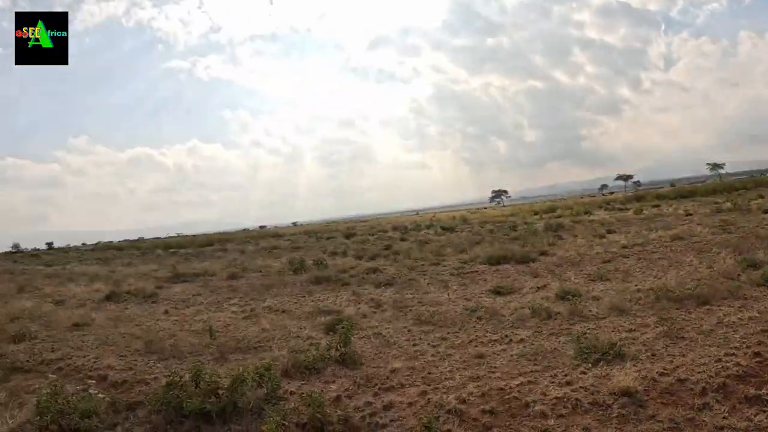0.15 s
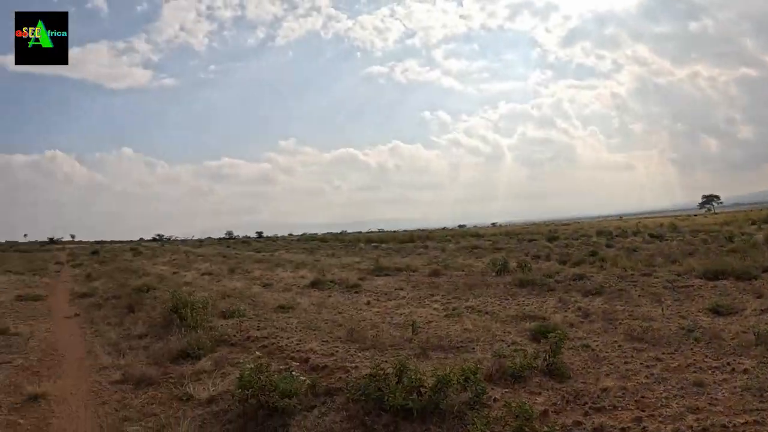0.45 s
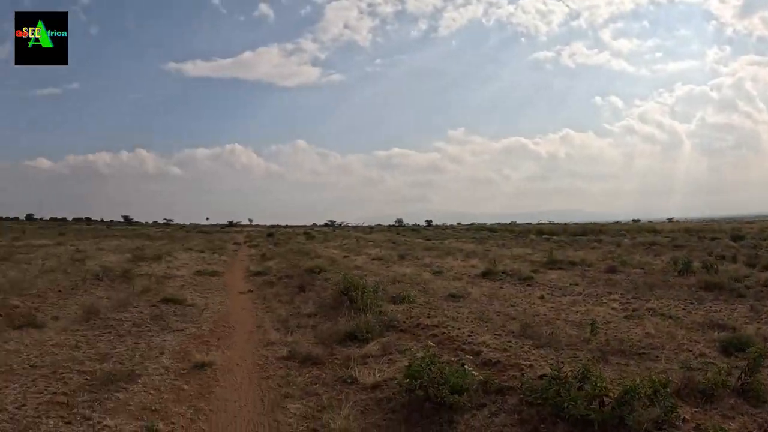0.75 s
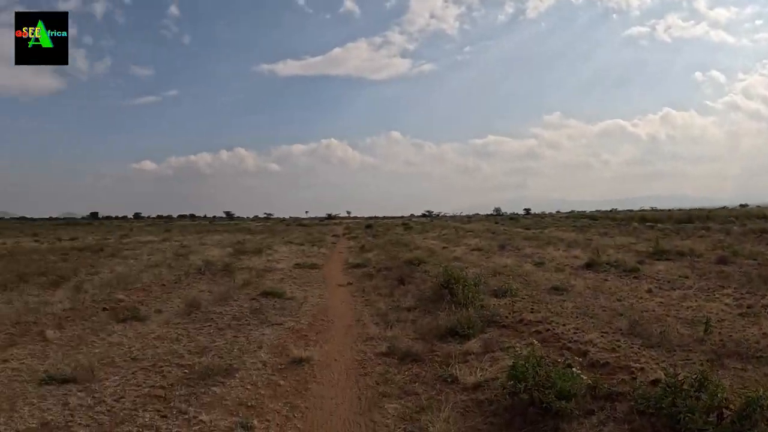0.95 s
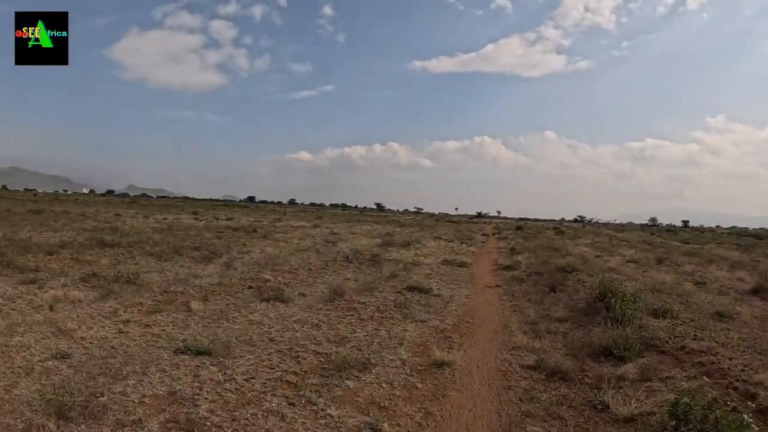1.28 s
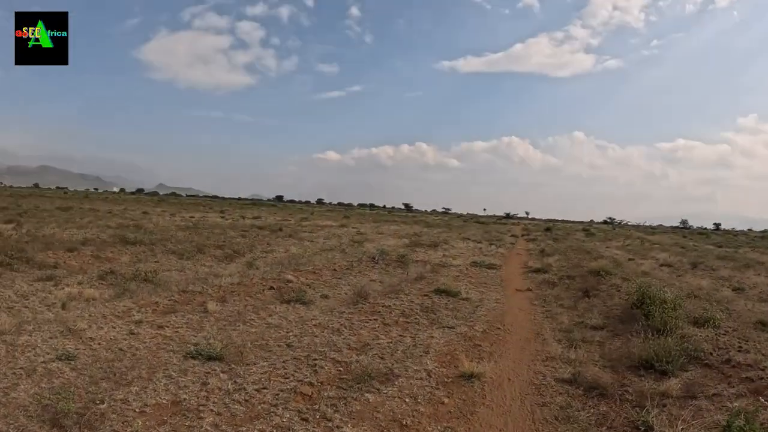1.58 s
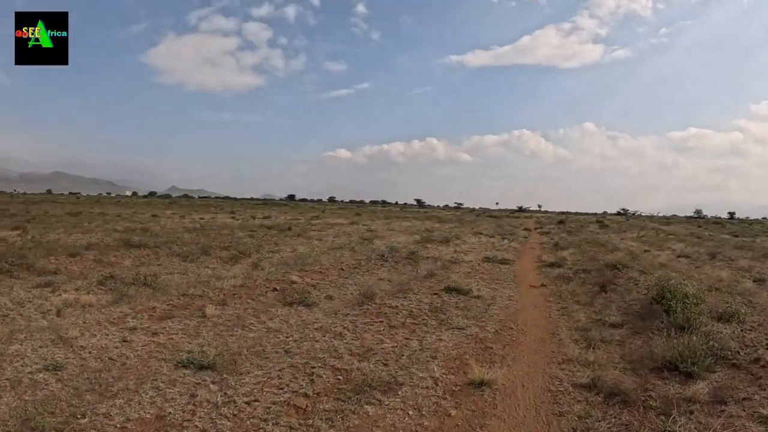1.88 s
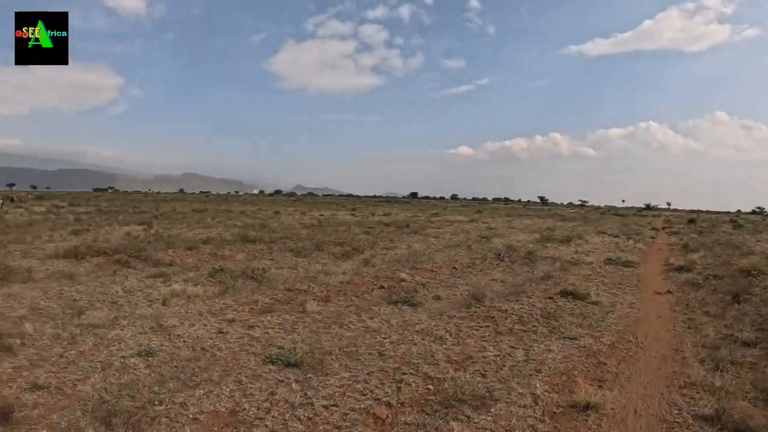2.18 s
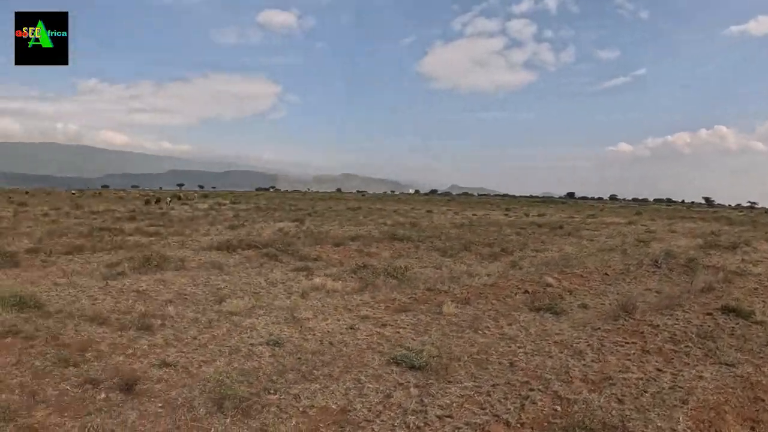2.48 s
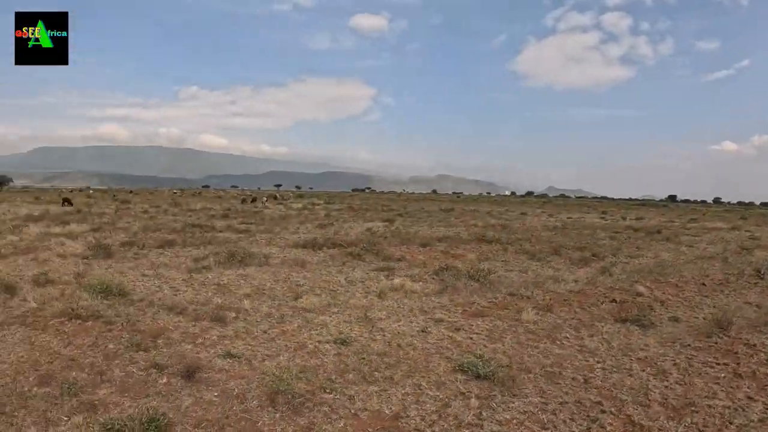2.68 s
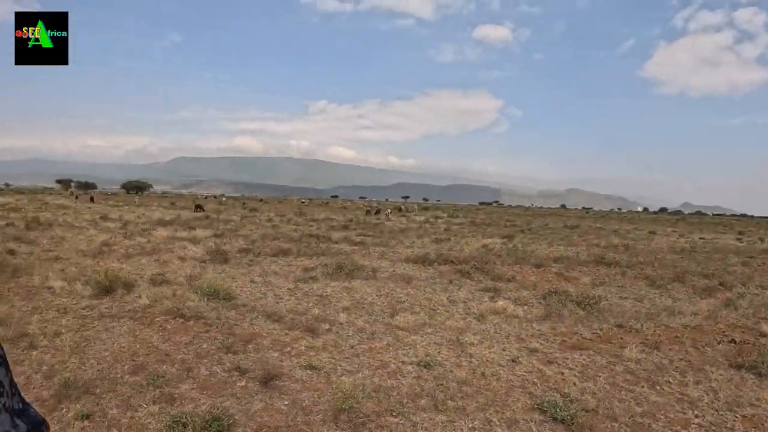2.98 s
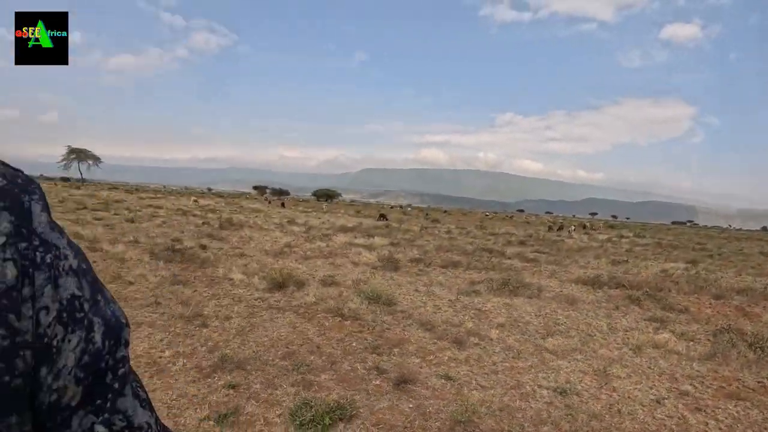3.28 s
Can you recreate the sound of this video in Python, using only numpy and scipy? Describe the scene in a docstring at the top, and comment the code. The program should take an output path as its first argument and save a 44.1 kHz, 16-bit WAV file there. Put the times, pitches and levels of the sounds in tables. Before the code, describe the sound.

Wind rumbles and thumps on a handheld microphone over open dry grassland, with faint rustles and ticks; after two seconds a distant sheep bleats quaveringly and a second joins, lower and level, under hard gusts.

```python
"""Wind rumbles on the microphone and dry grass rustles, with small ticks close by and faint swishes:
all are shaped noise. Two sheep then bleat some way off on open grassland, one quavering, the other
joining with a level, buzzing call: vocal-fold pulses and puffs of noise filtered by a throat.
Gusts, swells of low noise, buffet the microphone hard during the bleats, with sudden pops."""
import sys
import numpy as np
from scipy import signal
from scipy.fft import rfft, irfft
from scipy.io import wavfile

SR = 44100
rng = np.random.default_rng(int(sys.argv[2]) if len(sys.argv) > 2 else 0)


def transcribe(u):
    """Save the signal u as a 16-bit wav file named by the first command-line argument.

    u: samples, shape (n,) or (channels, n), limited to [-1, 1]; the rate is SR.
    q: integer samples, one column per channel.
    """
    v = np.clip(np.atleast_2d(u).T, -1, 1)
    q = np.round(v * 32767).astype(np.int16)
    wavfile.write(sys.argv[1], SR, q)


N = 152145
T = np.arange(N) / SR  # time [s]

# Throbs of the quavering bleat:
# (time [s], level [dB], top pitch [Hz], roughness [0-1], mouth opening [0-1])
QUAVER_THROBS = [(2.128, -63, 222.3, .55, 0.98), (2.205, -58.5, 263.4, 0.55, .8),
                 (2.285, -58, 280, 0.56, 0.55), (2.338, -56, 270.5, 0.2, 0.66),
                 (2.408, -52.5, 272.8, 0.12, 0.32), (2.478, -56, 276, 0, 0), (2.552, -55.5, 278.6, 0, 0.05),
                 (2.626, -56.5, 285.2, 0.1, 0.06), (2.705, -61, 280.8, 0.15, 0),
                 (2.779, -51.5, 274.4, 0.2, 0.4), (2.843, -50.5, 239, 0.3, 0.64),
                 (2.916, -51.5, 248.2, .2, 0.8), (2.998, -53, 223.4, 0.3, 0.6),
                 (3.073, -48.5, 277.1, 0.2, 0.2), (3.152, -53, 242, 0.3, 0.06)]
# Throat response of the quavering sheep:
# (frequency [Hz], gain with mouth half shut [dB], gain with mouth wide open [dB])
QUAVER_THROAT_RESPONSE = [(250, -7, -10.5), (550, 0.5, -10), (834, -8, 0.5), (1180, -32.5, -6),
                          (1600, -39.5, -30.5), (1930, -17.5, -23.5), (2330, 0, 0.5), (2546, -6.5, -16.5),
                          (2890, -6, -15), (3346, 4.5, 4), (3380, -1, -9.5), (3680, -1, 5.5),
                          (4070, -21.5, -10), (5540, -22, -19.5), (6500, -32, -16), (8100, -48, -34),
                          (10140, -56.5, -51.5)]
# Mean pitch of the level bleat: (time [s], pitch [Hz])
LEVEL_PITCH = [(2.64, 168), (2.72, 175), (2.8, 177.5), (2.9, 178.3), (3.0, 179), (3.1, 180.5),
               (3.16, 179.5), (3.21, 174.8), (3.25, 177), (3.295, 174), (3.335, 167.5), (3.42, 152)]
# Vocal effort of the level bleat: (time [s], level [dB], roughness [0-1])
LEVEL_EFFORT = [(2.62, -98.5, 0.2), (2.67, -59.5, 0.48), (2.77, -64, .2), (2.85, -55.5, 0.4),
                (2.95, -57.5, 0.3), (3.08, -60, 0), (3.19, -57.5, 0.04), (3.28, -56.5, 0.04),
                (3.33, -58.5, .02), (3.36, -65, 0.3), (3.44, -90, .4)]
# Throat response of the level sheep: (frequency [Hz], gain [dB])
LEVEL_THROAT_RESPONSE = [(180, -4.5), (500, -17), (720, 3.5), (920, -21), (1200, -18), (1440, -1),
                         (1720, -14), (1950, -6), (2200, 7), (2360, 0.5), (2520, 3.5), (2850, -10),
                         (3300, -5), (4150, -3), (4700, -25), (5700, -13), (6600, -31), (7500, -21.5),
                         (9000, -33.5), (11000, -55.5)]
# Gusts on the microphone, before roughening:
# (time [s], half length [s], level [dB], upper corner [Hz])
GUST_EDDIES = [(-0.01, 0.027, -35.5, 168), (0.153, 0.093, -43, 264), (0.49, 0.31, -51, 199),
               (0.636, 0.062, -35, 118), (0.901, 0.04, -30.5, 141), (1.046, 0.032, -34.5, 165),
               (1.232, 0.03, -34, 150), (1.405, 0.036, -40, 315), (1.546, 0.034, -32.5, 217),
               (1.628, 0.037, -40.5, 216), (1.839, 0.056, -32.5, 216), (2.112, 0.03, -35, 155),
               (2.291, 0.1, -26, 126.3), (2.358, 0.03, -21, 158.5), (2.432, 0.014, -28, 141.4),
               (2.698, 0.028, -29, 308), (2.753, 0.021, -17, 417), (2.777, 0.022, -18.5, 385),
               (2.827, 0.012, -19.5, 340), (2.86, 0.018, -20, 320), (2.887, 0.013, -17.5, 410),
               (2.914, 0.015, -22.5, 427), (2.935, 0.043, -28.5, 294), (3.105, 0.023, -30, 127.7),
               (3.218, 0.035, -34, 137), (3.383, 0.021, -30, 144)]
# Pressure pops in the strongest gust: (time [s], peak [dB], width [s], crackle level [dB])
PRESSURE_POPS = [(2.728, -12.5, 0.0016, -59), (2.748, -14, 0.0007, -76), (2.757, -13.5, 0.00036, -59.5),
                 (2.78, -14, 0.0012, -60.5), (2.802, -14, 0.00041, -77)]
# Low wind rumble: (time [s], level [dB])
RUMBLE_LEVEL = [(0, -27.5), (.12, -31), (.27, -39.5), (.4, -34.5), (.58, -34), (.63, -30.5), (.89, -27),
                (.97, -36), (1.5, -30), (1.72, -33.5), (2.08, -30.5), (2.31, -25.5), (2.44, -23.5),
                (2.49, -32.5), (2.62, -36), (2.74, -17.5), (2.95, -23.5), (3.04, -28.5), (3.11, -21),
                (3.18, -28.5), (3.45, -28)]
# Spectrum of the rumble: (frequency [Hz], relative level [dB])
RUMBLE_SPECTRUM = [(8, -4), (24, 2.5), (45, 0.5), (75, -2), (110, -6), (180, -15), (300, -36), (600, -48.5),
                   (1500, -63.5), (5000, -100)]
# Small ticks and knocks: (time [s], peak [dB], centre [Hz], width [Hz], decay [s])
SMALL_TICKS = [(0.132, -38, 614, 380, 0.0049), (.17, -50, 1160, 513, 0.0039),
               (1.241, -53, 810, 880, 0.0024), (1.401, -45, 696, 1700, 0.0024),
               (1.417, -55, 1500, 4000, 0.0045), (1.427, -41, 600, 704, 0.0026),
               (1.456, -49, 900, 2220, 0.011), (2.0129, -39, 1600, 1550, 0.0011),
               (2.075, -37, 916, 300, 0.0048), (2.7, -33.5, 690, 600, 0.0057),
               (2.923, -27, 745, 300, 0.0038), (2.988, -60, 9055, 2040, .006),
               (3.225, -43.5, 6600, 1900, 0.0022), (3.225, -42.5, 1220, 700, 0.0031),
               (3.32, -52, 1440, 593, 0.0042), (3.382, -42.5, 1280, 695, 0.0051)]
# Faint swishes and scuffs: (time [s], half length [s], level [dB], centre [Hz], width [Hz])
FAINT_SWISHES = [(0.208, 0.085, -68, 1510, 290), (0.394, 0.091, -65.5, 1500, 250),
                 (0.683, 0.011, -65, 1346, 118), (0.821, 0.1, -68.5, 1380, 293),
                 (1.432, 0.051, -57, 590, 345), (2.082, 0.016, -58, 1490, 800),
                 (2.709, 0.026, -46, 850, 352)]
# Mean rustle of the grass: (time [s], level [dB])
RUSTLE_LEVEL = [(0, -72.5), (.14, -64), (.27, -70.5), (.37, -67), (.53, -79.5), (.68, -76), (.8, -71.5),
                (.95, -70.5), (1.2, -88.5), (1.35, -73), (1.42, -62.5), (1.5, -65), (1.6, -71),
                (1.8, -75.5), (2.0, -75), (2.35, -65.5), (2.6, -64), (3.45, -64)]
# Spectrum of the rustle: (frequency [Hz], relative level [dB])
RUSTLE_SPECTRUM = [(200, -5), (600, 6), (1000, -7), (1500, -3.5), (2200, -2), (3400, -7), (4500, -16.5),
                   (7500, -20.5), (10000, -32), (15000, -42)]
# Spectrum of the steady air: (frequency [Hz], relative level [dB])
AIR_SPECTRUM = [(200, -4.5), (400, -11.5), (700, -17.5), (1500, -26), (3000, -36.5), (4500, -41.5),
                (7500, -44.5), (10000, -53), (15000, -58)]


def quavering_sheep():
    """Amplitude and frequency modulation: about 14 throbs a second, brighter with a wider mouth."""
    attack_s, release_s = 0.012, 0.07
    depth_db, fullness, pitch_dip_hz = 12.5, 2.6, 30
    pitch_lag, pitch_drop = 0.12, 0.16  # shares of a throb
    times = np.array(QUAVER_THROBS)[:, 0]
    db, top_hz, rough, mouth = curve(QUAVER_THROBS)
    start, end = times[0] - attack_s, times[-1] + release_s
    # whole numbers of the cycle fall on the loudest point of each throb
    marks = np.r_[start, times, end]
    cycle = np.interp(T, marks, np.r_[-0.5, np.arange(len(times)), len(times) - 0.3])
    # the pitch tops out just after the loudness, drops quickly, then climbs
    slack = np.interp((cycle - pitch_lag) % 1, [0, pitch_drop, 1], [0, 1, 0])
    hz = top_hz - pitch_dip_hz * np.sin(np.pi / 2 * slack) ** 2
    source = folds(hz, rough, jitter=0.045, shimmer_db=0.5)
    throat = np.array(QUAVER_THROAT_RESPONSE)
    half_shut = colour(source, throat[:, [0, 1]])
    wide_open = colour(source, throat[:, [0, 2]])
    voice = (1 - mouth) * half_shut + mouth * wide_open
    fade = np.minimum((T - start) / attack_s, (end - T) / release_s)
    gate = np.sqrt(np.clip(fade, 0, 1))
    dip_db = depth_db * abs(np.sin(np.pi * cycle)) ** fullness
    return voice * gate * amp(db - dip_db)


def level_sheep():
    """Source and filter: a lower, slightly wavering buzz sags and dulls as the mouth closes."""
    shut_at_s, shut_time_s, shut_hz, shut_share = 3.15, 0.17, 2450, 0.78
    mean_hz, = curve(LEVEL_PITCH)
    db, rough = curve(LEVEL_EFFORT)
    hz = mean_hz * (1 + 0.002 * wander(22))
    source = folds(hz, rough, jitter=0.02, shimmer_db=0.9)
    voice = colour(source, LEVEL_THROAT_RESPONSE)
    lowpass = signal.butter(8, shut_hz, fs=SR, output="sos")
    muffled = signal.sosfiltfilt(lowpass, voice)
    shut = shut_share * np.clip((T - shut_at_s) / shut_time_s, 0, 1)
    gate = np.clip((T - LEVEL_EFFORT[0][0]) / 0.027, 0, 1)  # onset over 27 ms
    return ((1 - shut) * voice + shut * muffled) * gate * amp(db)


def folds(hz, rough, jitter, shimmer_db):
    """Periodic excitation: harmonics of the vocal-fold cycle mixed with a puff of noise in each."""
    turns = np.cumsum(hz * (1 + jitter * rough * wander(120))) / SR
    pulses = sum(np.cos(2 * np.pi * k * turns) for k in range(1, 64))
    puffs = np.exp(-(turns % 1) / 0.12) * rng.standard_normal(N)
    mix = (1 - rough) * unit(pulses) + rough * unit(puffs)
    return mix * amp(shimmer_db * wander(120)) / np.hypot(1 - rough, rough)


def field(x, wet_db, t60_s):
    """Scattering: decaying noise stands for weak returns from the ground and bushes."""
    t = T[:SR // 2]
    tail = rng.standard_normal(len(t)) * amp(-60 * t / t60_s) * (t > 0.004)
    return x + amp(wet_db) * signal.fftconvolve(x, tail / np.linalg.norm(tail))[:N]


def gusts():
    """Turbulent pressure: each eddy is a swell of low noise reaching up to its own corner."""
    low_hz, slope, rough_db = 86, 4.17, 0.87
    hz = np.fft.rfftfreq(SR, 1 / SR)
    highpass = (hz / np.hypot(hz, low_hz)) ** 2
    out = np.zeros(N)
    for at, half, db, corner_hz in GUST_EDDIES:
        shape = highpass / np.hypot(1, (hz / corner_hz) ** slope)
        noise = irfft(rfft(rng.standard_normal(SR)) * shape)
        eddy = steadied(noise, span_s=min(half, 0.058))
        out += np.resize(eddy, N) * amp(db) * np.exp(-((T - at) / half) ** 2)
    return out * amp(rough_db * wander(110))


def pops():
    """Pressure transients: sudden steps at the microphone port, with a tiny crackle on each."""
    crackle_decay_s = 0.00061
    out = np.zeros(N)
    for at, db, width_s, crackle_db in PRESSURE_POPS:
        u = (T - at) / width_s
        out += amp(db) * u * np.exp(0.5 - 0.5 * u ** 2)  # a swing from negative to positive
        crackle = rng.standard_normal(N) * np.exp(-abs(T - at) / crackle_decay_s)
        out += amp(crackle_db) * crackle
    return out


def rumble():
    """Turbulence noise: wind at the microphone port gives low noise of varying level."""
    db, = curve(RUMBLE_LEVEL)
    noise = colour(rng.standard_normal(N), RUMBLE_SPECTRUM)
    return steadied(noise, span_s=0.039) * amp(db)


def ticks():
    """Damped resonance: short noise bursts each ring one broad band."""
    hz, out = np.fft.rfftfreq(N, 1 / SR), np.zeros(N)
    for at, db, centre_hz, width_hz, decay_s in SMALL_TICKS:
        burst = rng.standard_normal(N) * (T >= at) * np.exp(-abs(T - at) / decay_s)
        resonance = np.exp(-((hz - centre_hz) / width_hz) ** 2)
        tick = irfft(rfft(burst) * resonance, N)
        out += amp(db) * tick / abs(tick).max()
    return out


def swishes():
    """Band-limited noise: narrow bands swell softly and fade."""
    hz, out = np.fft.rfftfreq(N, 1 / SR), np.zeros(N)
    for at, half, db, centre_hz, width_hz in FAINT_SWISHES:
        resonance = 1 / (1 + ((hz - centre_hz) / width_hz) ** 2)
        band = irfft(rfft(rng.standard_normal(N)) * resonance, N)
        out += unit(band) * amp(db) * np.exp(-((T - at) / half) ** 2)
    return out


def grass():
    """Granular noise: dry stalks rustle in random fine grains over a faint steady wash of air."""
    grains_per_s, grain_spread_db, flutter_db, air_db = 3000, 2.5, 1.8, -59.5
    db, = curve(RUSTLE_LEVEL)
    struck = rng.random(N) < grains_per_s / SR
    grain_db = grain_spread_db * np.minimum(rng.exponential(1, N), 4)
    grains = rng.standard_normal(N) * struck * amp(grain_db)
    rustle = colour(grains, RUSTLE_SPECTRUM) * amp(db + flutter_db * wander(42))
    air = amp(air_db) * colour(rng.standard_normal(N), AIR_SPECTRUM)
    return rustle + air


def amp(db):
    """Logarithmic level: decibels become an amplitude gain."""
    return 10 ** (np.asarray(db) / 20)


def unit(x):
    """Mean power: scales a signal to rms 1."""
    return x / np.sqrt(np.mean(x ** 2) + 1e-20)


def curve(rows):
    """Linear interpolation: joins every column of a table by straight lines in time."""
    times, *columns = np.transpose(rows)
    return [np.interp(T, times, c) for c in columns]


def colour(x, points):
    """Minimum-phase filtering: a causal filter of the given spectrum, with output at rms 1."""
    f, db = np.transpose(points)
    hz = abs(np.fft.fftfreq(8192, 1 / SR))
    log_gain = np.log(amp(np.interp(np.log(hz + 1), np.log(f + 1), db)))
    # the Hilbert transform of the log gain gives the phase
    response = np.exp(np.conj(signal.hilbert(log_gain)))
    taps = np.fft.ifft(response).real[:4096]
    return unit(signal.fftconvolve(x, taps)[:N])


def wander(rate_hz):
    """Low-passed noise: random motion of rms 1, mostly below the given rate."""
    hz = np.fft.rfftfreq(N, 1 / SR)
    return unit(irfft(rfft(rng.standard_normal(N)) / (1 + (hz / rate_hz) ** 4), N))


def steadied(x, span_s):
    """Envelope normalisation: evens out the slow chance swells of a noise."""
    window = signal.windows.hann(2 * max(int(span_s * SR), 2))
    power = signal.fftconvolve(x ** 2, window / window.sum(), "same")
    return x / np.sqrt(abs(power) + 1e-12)


def scene():
    """Superposition: sheep in the field add to wind and small noises at the microphone."""
    sheep = field(quavering_sheep() + level_sheep(), wet_db=-21, t60_s=0.25)
    wind = gusts() + pops() + rumble()
    small_noises = ticks() + swishes() + grass()
    return (sheep + wind + small_noises)[None]


def record(dry):
    """Band limiting: the recorder passes only what lies below its cutoff."""
    cutoff_hz = 15400
    lowpass = signal.firwin(511, cutoff_hz, window=("kaiser", 9), fs=SR)
    return signal.oaconvolve(dry, lowpass[None], "same")


dry = scene()
out = record(dry)
transcribe(out)
```